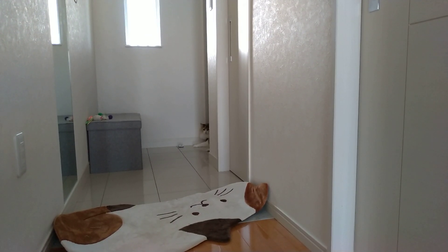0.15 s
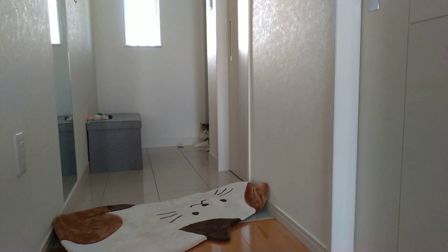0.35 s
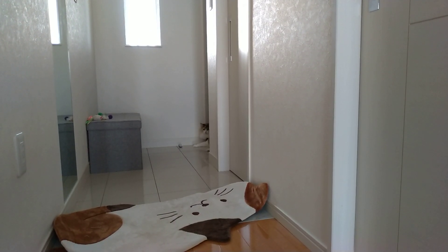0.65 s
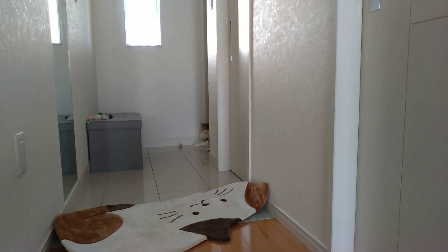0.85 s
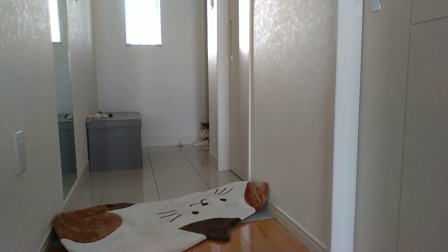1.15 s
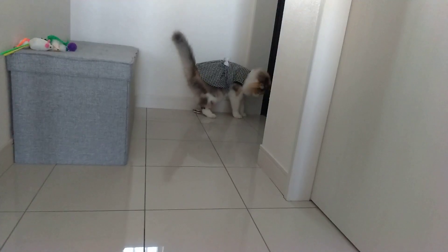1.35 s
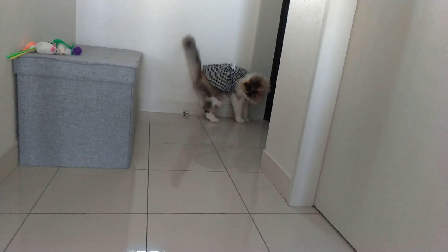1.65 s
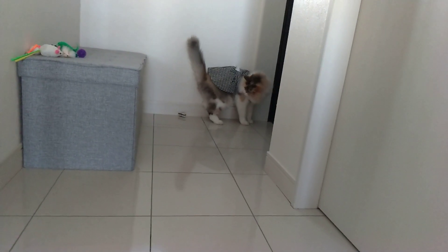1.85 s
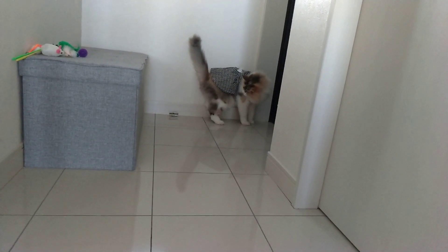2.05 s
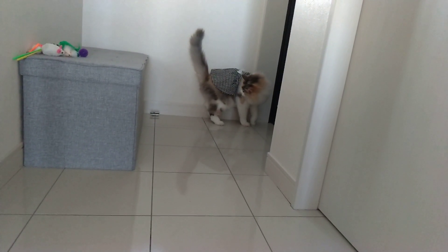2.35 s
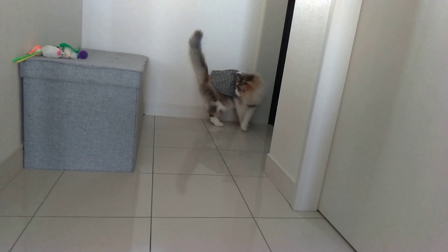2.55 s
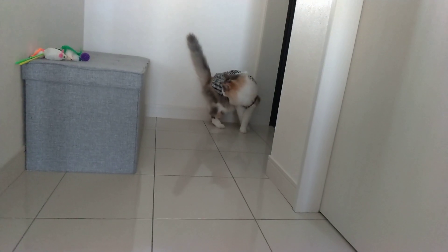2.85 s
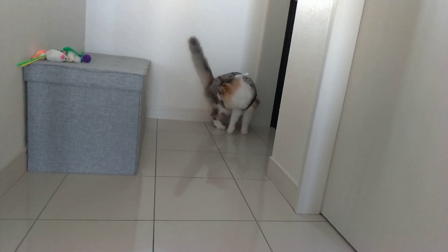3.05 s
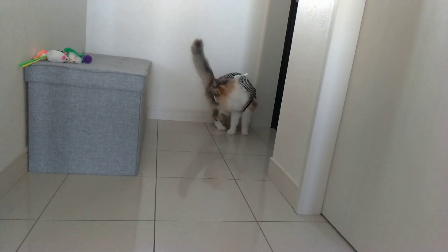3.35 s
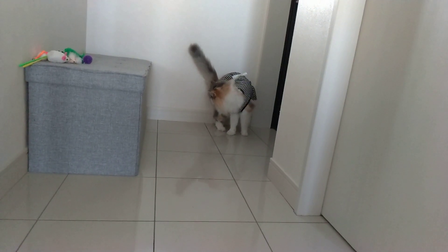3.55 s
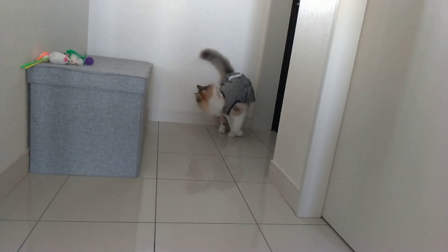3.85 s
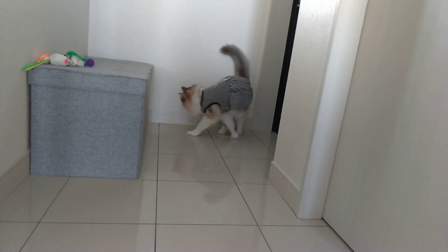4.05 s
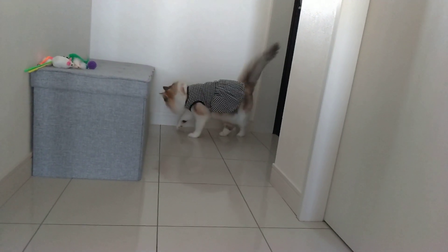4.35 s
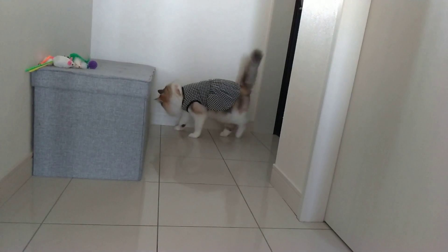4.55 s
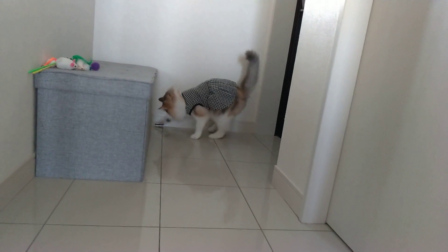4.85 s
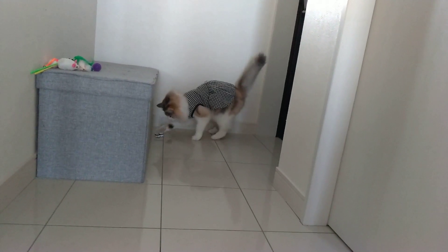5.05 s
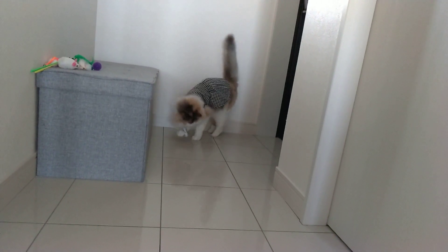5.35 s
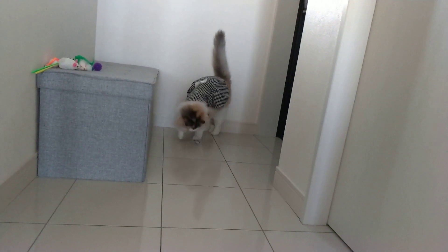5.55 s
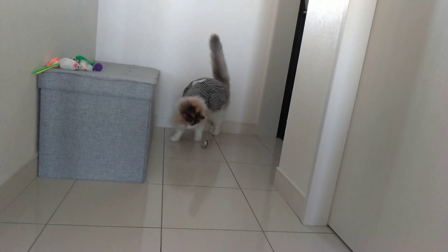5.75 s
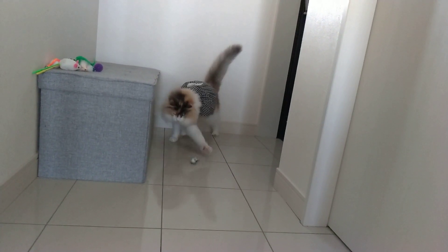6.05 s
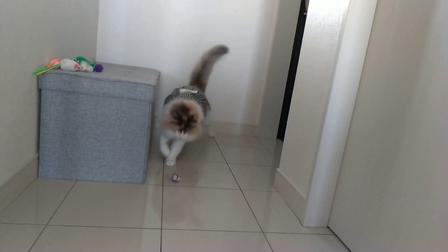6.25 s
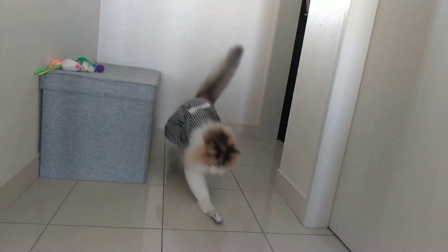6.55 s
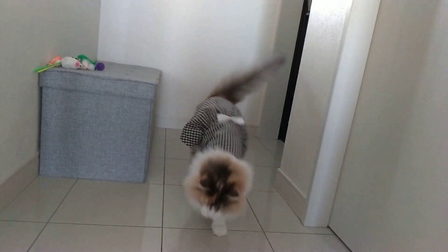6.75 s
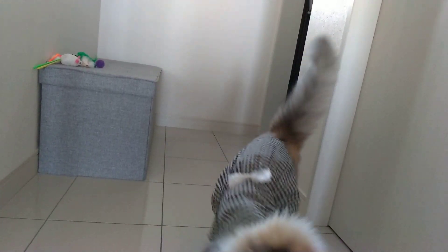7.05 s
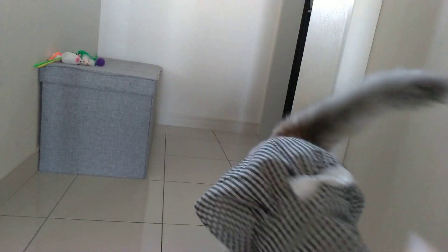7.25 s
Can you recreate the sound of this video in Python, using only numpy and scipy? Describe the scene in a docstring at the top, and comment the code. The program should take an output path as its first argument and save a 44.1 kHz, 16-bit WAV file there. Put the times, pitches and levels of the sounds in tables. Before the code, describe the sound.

A small battery toy whirrs and ticks, then cuts off; soft hollow knocks follow, then a hard plaything skitters and rolls closer over tiles.

```python
"""A small battery toy whirrs and ticks in a tiled hallway until the whirr cuts off: tones, grit and gear ticks.
A hard little plaything then skitters and rolls over the tiles towards the microphone: noise impacts whose
direct crack grows with nearness, gliding resonances for the roll, and brief thin rings.
At the far end a cat paws at something in soft, hollow knocks, heard mostly by way of the walls, with faint
claw ticks. Low room rumble, a hum and a thin hiss lie under it; the two microphone ports share the bass."""
import sys
import numpy as np
from scipy import signal
from scipy.fft import rfft, irfft
from scipy.io import wavfile
from scipy.ndimage import uniform_filter1d

SR = 44100
rng = np.random.default_rng(int(sys.argv[2]) if len(sys.argv) > 2 else 0)


def master(y):
    """Save y as 16-bit WAV."""
    cut = np.clip(np.atleast_2d(y).T, -1, 1)
    pcm = np.round(cut * 32767)  # scale
    wavfile.write(sys.argv[1], SR, pcm.astype(np.int16))


N = 325891
TIME = np.arange(N) / SR  # s
HIT_SIZE = 32768  # samples in one contact with its echoes

# tones of the running motor and its casing: (frequency [Hz], width [Hz], relative level [dB])
MOTOR_TONES = [(364, 23, -62.5), (391, 6.7, -64), (509, 16, -67), (573.4, 37, -54), (705, 29, -56.5),
               (743, 6.3, -59.5), (1020, 30, -57.5), (1107, 10.5, -57.5), (1373, 7.2, -62), (1710, 14, -61)]
# further gear ticks at uneven times, some louder, some softer: (time [s], relative level [dB])
UNEVEN_GEAR_TICKS = [(0.0358, -34), (0.292, -35), (0.3565, -33.5), (0.4518, -29), (0.754, -33.5),
                     (0.853, -31), (0.867, -29.5), (0.987, -34), (1.056, -35), (1.1137, -35), (1.2423, -35)]
# colour of the gear rattle: (frequency [Hz], relative level [dB])
WHIRR_COLOUR = [(150, -17), (300, -19.5), (600, -12), (950, -3.5), (1400, -10), (1900, -9.5), (2500, -15.5),
                (4300, -11), (7500, -17), (9600, -11), (16000, -24)]
# colour of gear and claw ticks: (frequency [Hz], relative level [dB])
TICK_COLOUR = [(500, -17.5), (2000, -8), (4000, -4), (7500, -6), (9600, 3.5), (12500, -5.5), (16000, -16.5)]
# the plaything striking the tiles: (time [s], relative level [dB], body [dB], treble [dB])
CLICKS = [(4.9535, -39.5, 17, -10), (4.971, -39, 18, -9), (5.4753, -35, 14.5, -8), (5.5451, -27, 2.5, -6),
          (5.6444, -36.5, 3, 0), (5.6656, -33, 3, -1.5), (5.7532, -37, 7.5, 1), (5.9561, -29.5, -7, -4.5),
          (5.973, -24.5, 2, -7), (6.047, -41, 15.5, 5), (6.0596, -33.5, -1, 5.5), (6.112, -39, 5, 10),
          (6.1807, -37, 10, 1), (6.2535, -37, 10.5, 4), (6.3336, -38.5, 2, -4), (6.386, -28, 5, -4),
          (6.4773, -32, 11, 2), (6.4923, -39.5, -8, 4), (6.5466, -31, -6, -3.5), (6.5817, -41.5, 18, -3),
          (6.6555, -38.5, 9, 2.5), (6.6724, -31, 2, 0.5), (6.8081, -40, -12, -2), (6.893, -27, -22, -7),
          (6.906, -29, -28, -5.5), (6.9497, -32.5, -5.5, -1), (6.9783, -34.5, -7, 2), (7.0412, -43, -6, -3),
          (7.0644, -41, -1, 1), (7.0687, -26, -7.5, -8.5), (7.098, -31, -2, -4.5), (7.1409, -27.5, -7.5, 1),
          (7.1459, -33.5, -10, 1.5), (7.251, -20.5, -2.5, -12), (7.2996, -41, -14, 14.5),
          (7.3413, -33.5, -3.5, -5), (7.372, -22, 0.5, -14)]
# colour of hard contacts on tile: (frequency [Hz], relative level [dB])
CLICK_COLOUR = [(88, -44), (150, -21.5), (280, -27.5), (675, -11), (774, -10.5), (1480, -8), (2700, -4.5),
                (5150, -5), (7920, -7), (9440, 1), (16000, -14.5)]
# resonances of the plaything: (frequency [Hz], width [Hz], height [dB])
TOY_MODES = [(1790, 150, 2), (2040, 200, 4.5), (2520, 250, 3), (2734, 54, 5), (3310, 54, 4),
             (3690, 44, 7.5), (4270, 540, 2), (9350, 260, 3)]
# the plaything's way towards the microphone: (time [s], distance [m])
APPROACH = [(5.5, 2.3), (6.2, 1.86), (6.9, 0.98), (7.39, 0.8)]
# the plaything rolling: (time [s], pitch [Hz], relative level [dB])
ROLL = [(6.029, 830, -56), (6.06, 810, -39), (6.2, 700, -42), (6.35, 660, -46), (6.42, 670, -44),
        (6.52, 738, -47.5), (6.57, 810, -38), (6.7, 860, -49.5), (6.8, 783, -70)]
# brief thin rings and squeaks of the plaything: (time [s], frequency [Hz], relative level [dB])
RINGS = [(2.155, 3480, -57), (2.47, 3300, -60), (2.73, 3510, -57), (4.13, 2970, -53), (4.835, 3500, -57),
         (5.18, 2820, -50.5), (5.69, 2320, -43), (5.755, 2740, -41.5), (5.885, 9100, -31),
         (5.893, 2850, -44.5), (6.765, 3420, -45.5), (6.775, 2730, -44)]
# soft knocks at the far end; a padded blow thuds, a claw adds treble:
# (time [s], relative level [dB], thud [dB], treble [dB])
KNOCKS = [(1.5434, -37.5, 8.5, 4.5), (1.765, -46, 14.5, -2), (1.9332, -31, -2.5, -11),
          (2.1547, -56, -13, 5), (2.9276, -38.5, 4, -3), (2.9415, -31, 2, 10.5), (3.0569, -31.5, -0.5, 3.5),
          (3.1762, -35.5, -2.5, -6), (3.2382, -37, 7, 4), (3.306, -32, -14, -1), (3.3159, -32.5, -4, 6.5),
          (3.35, -30.5, -4.5, -1.5), (3.5775, -32, -6, -2), (3.6516, -33, -2.5, 2.5),
          (3.6637, -27, -4.5, -4.5), (3.7642, -38, 4, -2), (3.948, -31.5, -1.5, -3.5),
          (4.0169, -37.5, -4, 10), (4.0877, -37, 3.5, -11), (4.1444, -42.5, 2, -7),
          (4.2638, -46.5, 10.5, 2), (4.594, -49, 2, -9), (4.936, -51, 10, 16), (5.0188, -56.5, 7, 26.5),
          (5.1544, -54, -9, 18.5), (5.179, -53, -28, 20.5)]
# colour of the far knocks: (frequency [Hz], relative level [dB])
KNOCK_COLOUR = [(120, -59), (200, -18.5), (328, -8.5), (709, 5), (1180, 0.5), (1480, -7), (2020, -6),
                (4040, -8), (7540, -19.5), (9230, -14), (14900, -30), (16000, -35)]
# centres of thud, body, reference and treble in a contact: (frequency [Hz])
TINT_HZ = (380, 950, 2800, 10000)
# hallway resonances: (frequency [Hz], width [Hz], height [dB])
HALL_MODES = [(327, 55, 5.5), (428.6, 25, 7.5), (576.2, 10.4, 6.5), (716, 22, 5), (798, 15, 6),
              (938, 18, 5), (960, 20, 3), (1189, 17, 8)]
# colour of the room rumble: (frequency [Hz], relative level [dB])
ROOM_COLOUR = [(25, -33), (60, -3.5), (96, -4.5), (140, -8), (280, -20), (420, -15), (780, -17),
               (1250, -27.5), (2000, -25.5), (5000, -33.5), (7000, -35.5), (9000, -70)]
# colour of the thin hiss: (frequency [Hz], relative level [dB])
HISS_COLOUR = [(5000, -10), (8000, -14), (9700, 2.5), (11000, -8.5), (16000, -11.5)]
# stereo width, next to none in the bass: (frequency [Hz], side minus mid gain [dB])
WIDTH = [(60, -25.5), (125, -8), (250, -9.5), (500, -9), (1000, -1), (2000, 0), (16000, 0)]
# the right port hears the upper mids a little louder: (frequency [Hz], left minus right [dB])
PORT_BALANCE = [(500, .5), (1000, -0.5), (2000, -2.5), (4000, -3), (8000, 1), (14000, 1.5)]

CUT_S = 1.275  # the whirr stops
# the gear train at first ticks once a turn
FIRST_TICK_S, GEAR_TURN_S = 0.0055, 0.0865
TICK_DB, TICK_SCATTER_DB = -33, 2  # on the same relative scale as the uneven ticks
# at this distance the crack of a click has its reference level
CRACK_REACH_M = 3.41
# a click's thud follows its body and grows with nearness: offset, then shares of each
CLICK_THUD_DB, CLICK_THUD_SHARE, NEAR_THUD_SHARE = -7.5, 0.66, 1.14
# the plaything passes to the right of the microphone: left minus right at 1 m
PASS_PAN_DB = -0.7
# it is out of round and bumps once a turn
FIRST_BUMP_S, ROLL_TURN_S, BUMP_FADE_DB = 6.052, 0.07, 5.5
# higher rings die sooner: decay time at 3 kHz, and the power of frequency by which it shortens
RING_T60_S, RING_DAMPING = 0.45, 0.73
# hollow body that all knocks share
KNOCK_BODY_DB = -4
# claw ticks while the cat steps about
PATTER_S = (1.9, 5.4)
PATTER_DB, PATTER_SCATTER_DB = -75, 0.5
HALL_T60_LOW_S, HALL_T60_HIGH_S = 0.37, 0.24
ROOM_DB = -60
TOP_HZ = 15900  # the steep top cut


def motor(rattle_db=-45.5, tick_db=-8, tones_db=-1, whine_hz=576, whine_db=-59):
    """A thin whine, wavering casing tones, a rattle of gear teeth, even and uneven ticks, cut off together."""
    tones = 0
    for hz, width_hz, db in MOTOR_TONES:
        carrier = np.exp(2j * np.pi * hz * TIME)
        tones = tones + undb(db) * np.sqrt(2) * np.real(wander(width_hz) * carrier)
    pitch_hz = whine_hz * (1 + 0.0064 * np.real(wander(9.8)[0]))
    whine = np.sqrt(2) * np.sin(2 * np.pi * np.cumsum(pitch_hz) / SR)
    rattle = grit(per_s=400, scatter_db=4.0, colour=WHIRR_COLOUR)
    out = undb(tones_db) * tones + undb(whine_db) * whine + undb(rattle_db) * rattle
    colour = hall_colour(TICK_COLOUR, bins(HIT_SIZE))
    for s, db in gear_ticks(count=8) + list(UNEVEN_GEAR_TICKS):
        gain = colour * contact_point(patchy_db=2.5, spacing_hz=304)
        add(out, s, undb(db + tick_db) * blow(gain, crack_db=1, swell_s=0.0018))
    running = np.clip((CUT_S - TIME) / 0.0056 + 0.5, 0, 1)
    return out * running


def gear_ticks(count, slip_s=0.0012):
    """One tick a turn, each a little uneven in length and strength: rows (time [s], relative level [dB])."""
    slip, strength = rng.standard_normal((count, 2)).T
    drift_s = slip_s * (np.cumsum(slip) - slip[0])
    times = FIRST_TICK_S + GEAR_TURN_S * np.arange(count) + drift_s
    return list(zip(times, TICK_DB + TICK_SCATTER_DB * strength))


def clicks(trim_db=-0.5):
    """Hard little impacts on tile; the nearer, the more the crack tops the echo, thuds and leans right."""
    out = np.zeros((2, N))
    colour = hall_colour(CLICK_COLOUR, bins(HIT_SIZE), TOY_MODES)
    left_right = np.array([[1], [-1]])
    for s, db, body_db, treble_db in CLICKS:
        distance_m = np.interp(s, *np.transpose(APPROACH))
        near_db = 20 * np.log10(CRACK_REACH_M / distance_m)
        thud_db = CLICK_THUD_DB + CLICK_THUD_SHARE * body_db + NEAR_THUD_SHARE * near_db
        port_gain = undb(db + trim_db + left_right * PASS_PAN_DB / distance_m / 2)
        gain = colour * tint(thud_db, body_db, treble_db)
        gain = gain * contact_point(patchy_db=3.5, spacing_hz=164.3)
        add(out, s, port_gain * blow(gain, crack_db=near_db - 3, swell_s=0.003))
    return out


def rolling(width_hz=160, wobble=0.08, overtone=1.42, overtone_width_hz=420, overtone_db=-4, grit_db=-6):
    """Rolling excites two resonances that glide together and swell once a turn, chattering on small bumps."""
    times, pitches, levels = np.transpose(ROLL)
    pitch_hz = np.interp(TIME, times, pitches)
    level_db = np.interp(TIME, times, levels)
    turn = (TIME - FIRST_BUMP_S) / ROLL_TURN_S % 1
    bump = uniform_filter1d(undb(-BUMP_FADE_DB * turn), size=256)
    wobbling_hz = pitch_hz * (1 + wobble * np.real(wander(30)[0]))
    phase = 2 * np.pi * np.cumsum(wobbling_hz) / SR
    body = wander(width_hz) * np.exp(1j * phase)
    upper = undb(overtone_db) * wander(overtone_width_hz) * np.exp(1j * overtone * phase)
    chatter = undb(grit_db) * grit(per_s=84, scatter_db=5.0, colour=CLICK_COLOUR)
    on = np.clip(np.minimum(TIME - times[0], times[-1] - TIME) / 0.018, 0, 1)
    return on * bump * undb(level_db) * (np.real(body + upper) + chatter)


def rings(width_share=0.13, attack_s=0.0062):
    """Narrow, thin rings that fade in the hallway, the high ones first."""
    out = np.zeros((2, N))
    age = np.arange(HIT_SIZE) / SR
    for s, hz, db in RINGS:
        t60_s = RING_T60_S * (3000 / hz) ** RING_DAMPING
        fade = undb(db - 60 * age / t60_s)
        attack = 1 - np.exp(-age / attack_s)
        waver = wander(width_share * hz)[:, -HIT_SIZE:]
        tone = np.real(waver * np.exp(2j * np.pi * hz * age))
        add(out, s, fade * attack * tone)
    return out


def knocks():
    """Far, padded blows: a weak direct crack, so they are heard mostly by way of the walls."""
    out = np.zeros((2, N))
    colour = hall_colour(KNOCK_COLOUR, bins(HIT_SIZE), TOY_MODES)
    for s, db, thud_db, treble_db in KNOCKS:
        gain = colour * tint(thud_db, KNOCK_BODY_DB, treble_db)
        gain = gain * contact_point(patchy_db=3.5, spacing_hz=108.1)
        add(out, s, undb(db) * blow(gain, crack_db=-4.5, swell_s=0.0052))
    return out


def patter(count=18, treble_db=7):
    """Faint, crisp claw ticks on the tiles at random moments."""
    out = np.zeros((2, N))
    colour = hall_colour(TICK_COLOUR, bins(HIT_SIZE)) * tint(0, 0, treble_db)
    for s, strength in zip(rng.uniform(*PATTER_S, count), rng.standard_normal(count)):
        level_db = PATTER_DB + PATTER_SCATTER_DB * strength
        add(out, s, undb(level_db) * blow(colour, crack_db=10.5, swell_s=0.0034))
    return out


def room(hum_hz=90, hum_db=-63, hiss_db=-67, sing_db=-78, drift_db=2.0):
    """Drifting rumble in the hall's resonances, a hum, hiss and two high rings; dips as the whirr cuts off."""
    hum = np.real(wander(6.7) * np.exp(2j * np.pi * hum_hz * TIME))
    sing = sum(np.real(wander(270) * np.exp(2j * np.pi * hz * TIME)) for hz in (2780, 3520))
    dip_db = np.interp(TIME, [1.27, 1.29, 1.36, 1.38], [-0.5, -15.5, -5.5, 0])
    white = rng.standard_normal((2, N))
    air = unit(irfft(rfft(white) * hall_colour(ROOM_COLOUR, bins(N)), N))
    rumble = undb(ROOM_DB + drift_db * np.real(wander(1.4)[0])) * air
    hiss = noise(HISS_COLOUR)
    return undb(dip_db) * (rumble + undb(hum_db) * hum + undb(hiss_db) * hiss + undb(sing_db) * sing)


def blow(gain, crack_db, swell_s, crack_t60_s=0.033, bounce_db=-10, bounce_t60_s=0.049, snap_db=8):
    """One contact: treble snap, crack and floor bounce, then echoes that build up and die, treble first."""
    t, hz = np.arange(HIT_SIZE) / SR, bins(HIT_SIZE)
    crack, air = rng.standard_normal((2, 2, HIT_SIZE))
    low_pass = 1 / (1 + (hz / 6000) ** 2)
    dull = irfft(rfft(air) * low_pass)
    bright = air - dull
    tail = dull * undb(-60 * t / HALL_T60_LOW_S) + bright * undb(-60 * t / HALL_T60_HIGH_S)
    snap = irfft(rfft(crack) * (1 - low_pass)) * undb(snap_db) * np.exp(-t / 0.0005)
    crack_fade = undb(-60 * t / crack_t60_s)
    bounce_fade = undb(bounce_db - 60 * t / bounce_t60_s)
    direct = crack * np.hypot(crack_fade, bounce_fade)
    echoes = tail * (1 - np.exp(-t / swell_s))
    return ring_through(undb(crack_db) * (snap + direct) + echoes, gain)


def tint(thud_db, body_db, treble_db):
    """Soft contacts favour the lows, hard ones the treble."""
    points = list(zip(TINT_HZ, (thud_db, body_db, 0, treble_db)))
    return undb(curve(points, bins(HIT_SIZE)))


def contact_point(patchy_db, spacing_hz):
    """Each contact lands on another spot and favours other overtones, fully so above 1.5 kHz."""
    hz = bins(HIT_SIZE)
    ripple = np.interp(hz / spacing_hz, np.arange(1024), rng.standard_normal(1024))
    return unit(undb(patchy_db * ripple * np.minimum(hz / 1500, 1) ** 2))


def grit(per_s, scatter_db, colour, smear_s=0.04):
    """Dense tiny impacts of uneven size, each with a short smear of echoes; rms 1."""
    strength = undb(scatter_db * np.minimum(rng.exponential(size=N), 3))
    taps = (rng.random(N) < per_s / SR) * strength * rng.choice([-1, 1], N)
    t = np.arange(HIT_SIZE) / SR
    fade = np.exp(-t / smear_s) + 0.5 * np.exp(-t / 0.071) + 5 * np.exp(-t / 0.0014)
    echoes = rng.standard_normal((2, HIT_SIZE)) * fade
    rattle = signal.fftconvolve(taps[None], echoes)[:, :N]
    return unit(irfft(rfft(rattle) * undb(curve(colour, bins(N))), N))


def hall_colour(points, hz, modes=()):
    """Gain of a source's colour with its own and the hallway's resonances on it; mean power 1."""
    peaks_db = sum(db / (1 + (2 * (hz - f) / width) ** 2) for f, width, db in [*HALL_MODES, *modes])
    return unit(undb(curve(points, hz) + peaks_db))


def ring_through(x, gain):
    """Causal (minimum-phase) filter with the given gain per bin, by folding the cepstrum."""
    cepstrum = irfft(np.log(gain + 1e-6))
    half = len(cepstrum) // 2
    cepstrum[1:half] *= 2
    cepstrum[half + 1:] = 0
    return irfft(rfft(x) * np.exp(rfft(cepstrum)))


def wander(width_hz):
    """Slow complex chance, one per channel: turns a sine into a resonance of about that width."""
    white = rng.standard_normal((2, N)) + 1j * rng.standard_normal((2, N))
    pole = np.exp(-np.pi * width_hz / SR)
    z = signal.lfilter([1], [1, -2 * pole, pole ** 2], white)
    return z / np.std(z)


def noise(points):
    """Coloured stereo noise of rms 1."""
    white = rng.standard_normal((2, N))
    return unit(irfft(rfft(white) * undb(curve(points, bins(N))), N))


def curve(points, hz):
    """Join (Hz, dB) points on a log-frequency axis."""
    f, db = np.transpose(points)
    return np.interp(np.log(hz), np.log(f), db)


def bins(size):
    """Frequencies of a spectrum, kept off zero."""
    return np.maximum(np.fft.rfftfreq(size, 1 / SR), 1)


def undb(db):
    """Decibels to gain."""
    return 10 ** (np.asarray(db) / 20)


def unit(x):
    """Scale to rms 1."""
    return x / np.sqrt(np.mean(x ** 2))


def add(out, s, sound):
    """Mix a sound in at time s."""
    start = max(int(s * SR), 0)
    out[:, start:start + sound.shape[1]] += sound[:, :N - start]


def scene():
    """Everything in the hallway, from the toy to the room behind it."""
    return motor() + clicks() + rolling() + rings() + knocks() + patter() + room()


def record(dry):
    """Two close microphone ports share the bass and differ a little in colour; the top is cut steeply."""
    side_gain = undb(curve(WIDTH, bins(N)))
    keep_power = np.sqrt(2 / (1 + side_gain ** 2))
    mid = rfft(dry[0] + dry[1]) / 2 * keep_power
    side = rfft(dry[0] - dry[1]) / 2 * keep_power * side_gain
    lean = undb(curve(PORT_BALANCE, bins(N)) / 2)
    ports = irfft(np.array([(mid + side) * lean, (mid - side) / lean]), N)
    top_cut = signal.ellip(8, 0.2, 70, TOP_HZ, fs=SR, output="sos")
    return signal.sosfilt(top_cut, ports)


dry = scene()
out = record(dry)
master(out)
```